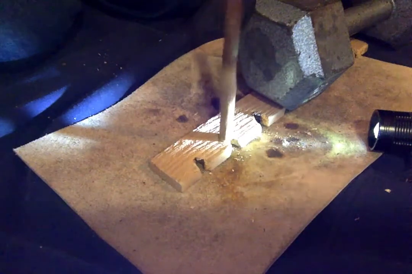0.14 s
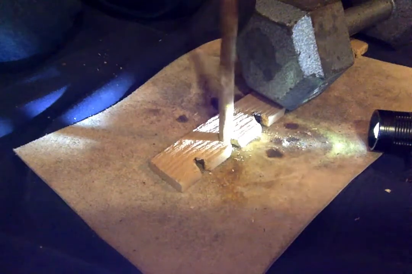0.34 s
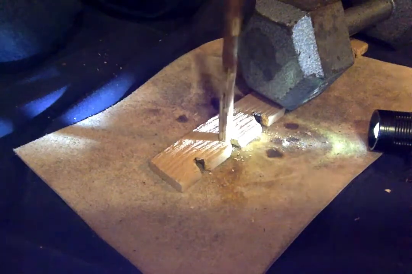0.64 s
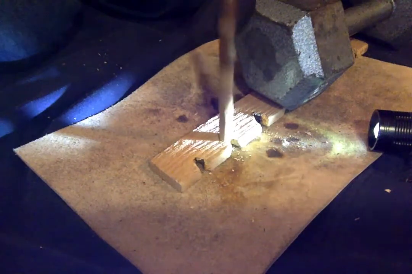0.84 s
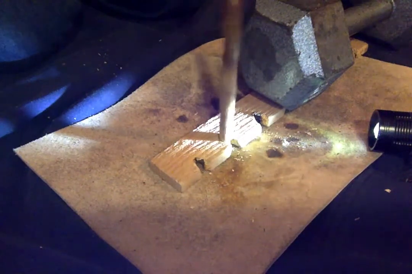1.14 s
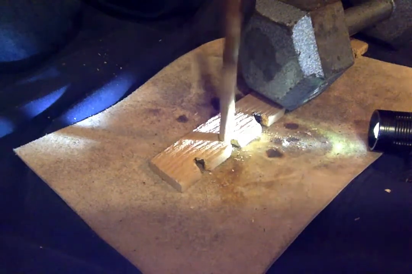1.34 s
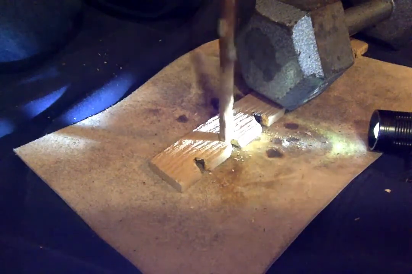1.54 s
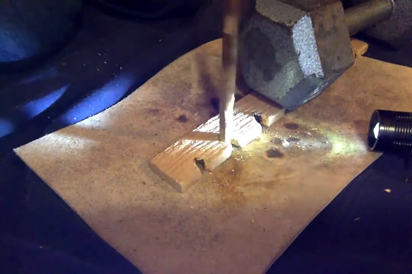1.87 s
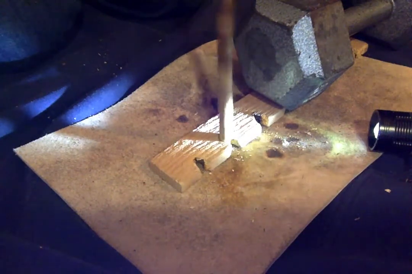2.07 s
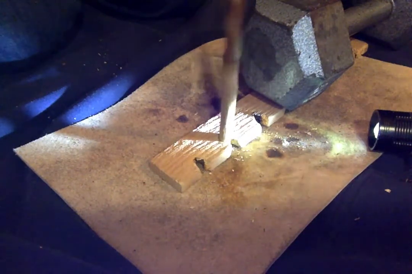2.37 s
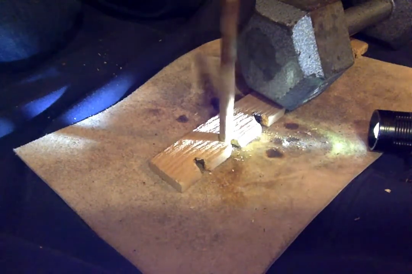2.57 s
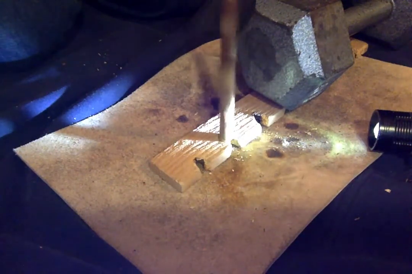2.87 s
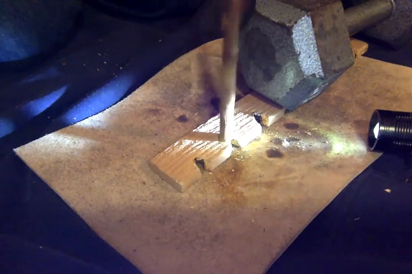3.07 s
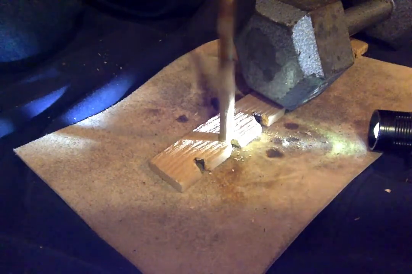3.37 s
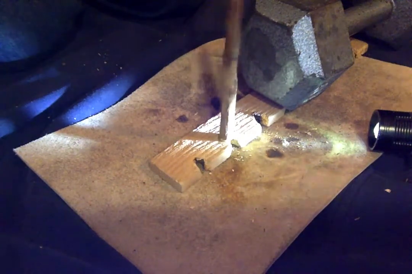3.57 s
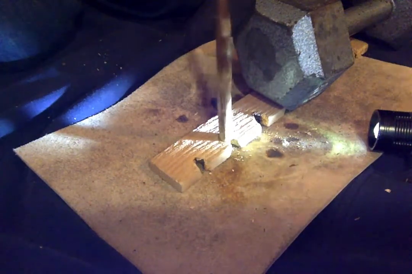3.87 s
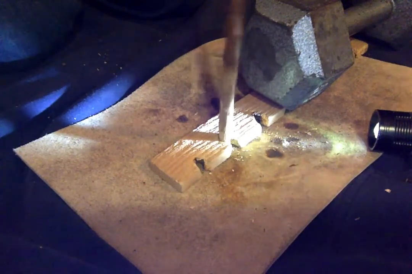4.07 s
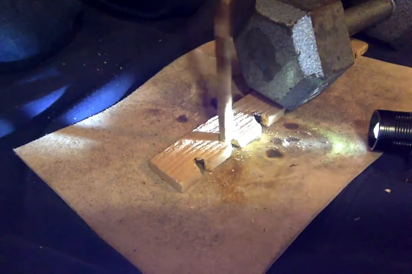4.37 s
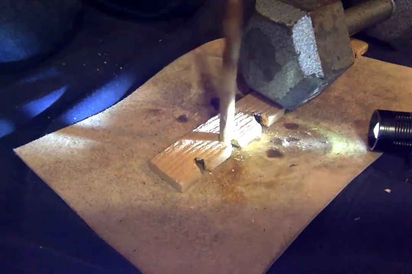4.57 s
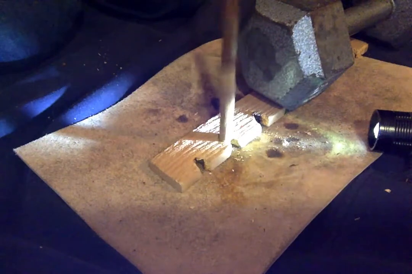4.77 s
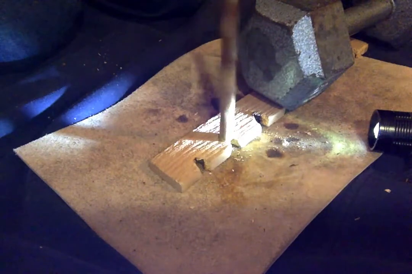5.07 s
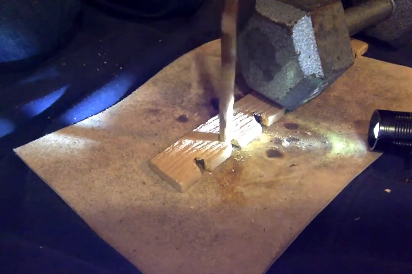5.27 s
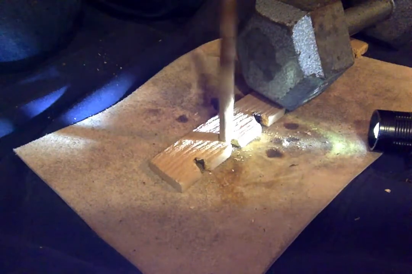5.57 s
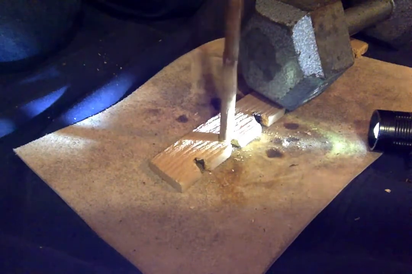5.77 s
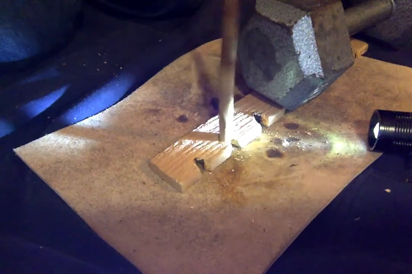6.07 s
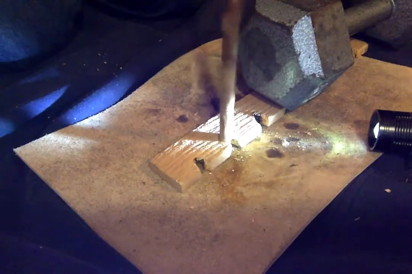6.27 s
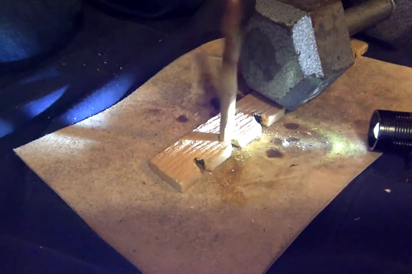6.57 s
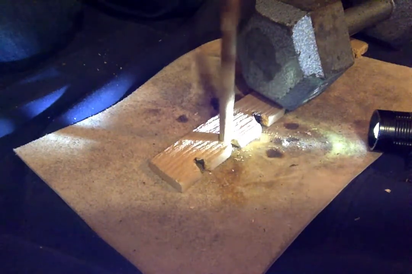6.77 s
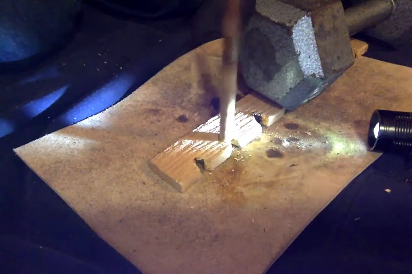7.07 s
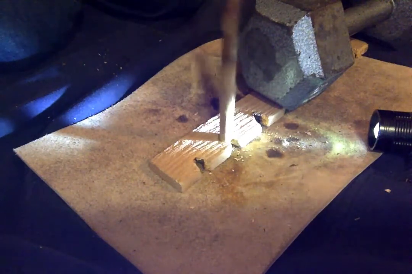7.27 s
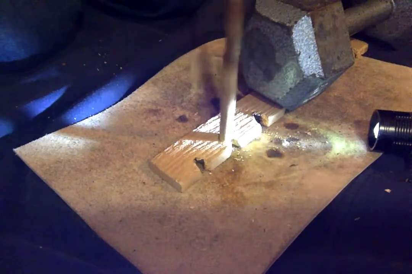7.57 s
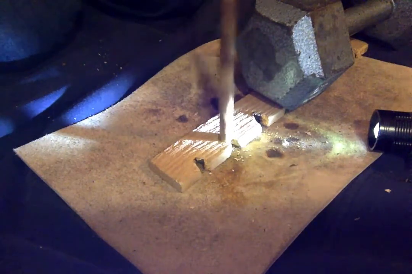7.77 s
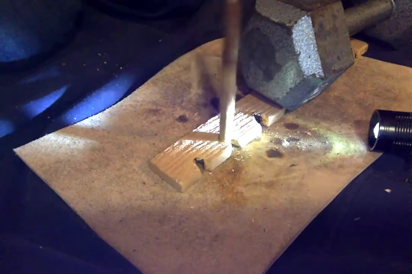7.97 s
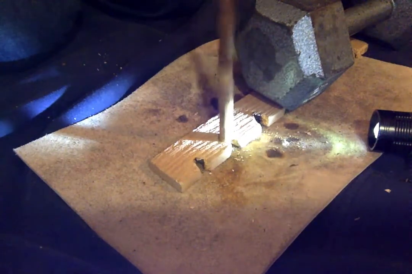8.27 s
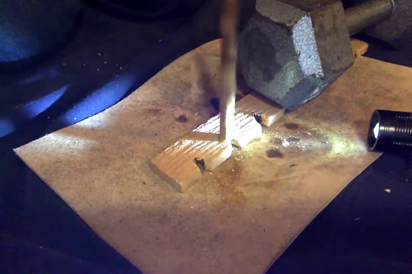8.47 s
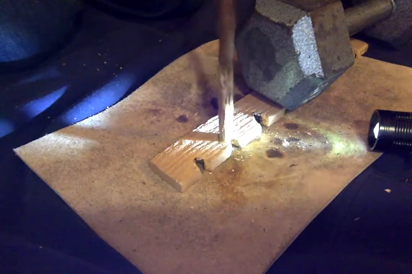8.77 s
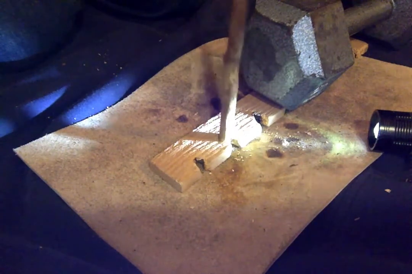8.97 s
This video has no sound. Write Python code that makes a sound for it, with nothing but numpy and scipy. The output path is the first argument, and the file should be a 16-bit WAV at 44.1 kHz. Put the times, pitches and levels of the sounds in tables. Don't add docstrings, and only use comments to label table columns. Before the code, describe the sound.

Close, dry to-and-fro scraping of a wooden stick twirled in a board socket, hissing and squeaking rhythmically, gradually quickening over faint outdoor air.

```python
import sys
import numpy as np
from scipy import signal
from scipy.io import wavfile
from scipy.ndimage import uniform_filter1d

SR = 44100
rng = np.random.default_rng(int(sys.argv[2]) if len(sys.argv) > 2 else 0)


def materialize(psi):
    bounded = np.clip(np.atleast_2d(psi).T, -1, 1)
    quanta = np.round(bounded * 32767).astype(np.int16)
    wavfile.write(sys.argv[1], SR, quanta)


def boost_factor(decibels):
    exponent = np.asarray(decibels, float) / 20
    return 10 ** exponent


N = 402633

# frequency in Hz, level in dB per Hz.
AIR_SPECTRUM = [(30, -22), (58, -9.5), (115, 3.5), (200, -9), (500, -10.5), (2500, -8.5), (7000, -11),
                (15800, -62)]
SPINDLE_TOP_HZ = 1950


def evened(x):
    return x / np.sqrt(np.mean(x ** 2) + 1e-20)


def colour(points, lo_hz=1, hi_hz=30000, modes=()):
    hz = abs(np.fft.fftfreq(4096, 1 / SR)) + 1
    point_hz, point_db = np.transpose(points)
    db = np.interp(np.log(hz), np.log(point_hz), point_db)
    for mode_hz, width_hz, peak_db in modes:
        db = db + peak_db / (1 + (2 * (hz - mode_hz) / width_hz) ** 2)
    gain = boost_factor(db) / np.sqrt((1 + (lo_hz / hz) ** 24) * (1 + (hz / hi_hz) ** 24))
    log_gain = np.log(gain + 1e-7)
    spectrum = np.exp(log_gain - 1j * signal.hilbert(log_gain).imag)
    return np.fft.ifft(spectrum).real[:2048] * np.hanning(4096)[2048:]


def through(x, taps):
    return evened(signal.oaconvolve(x, taps)[:N])


def resonate(x, hz, width_hz):
    turn = np.exp(2j * np.pi * np.cumsum(hz * np.ones(len(x))) / SR)
    r = np.exp(-np.pi * width_hz / SR)
    return 2 * (turn * signal.lfilter([1 - r], [1, -r], x / turn)).real


def add(mix, start_s, sound):
    at = round(start_s * SR)
    part = mix[max(at, 0):][:len(sound) + min(at, 0)]
    part += sound[max(-at, 0):][:len(part)]


def patches(shape, bins, frames):
    across_bins = uniform_filter1d(rng.standard_normal(shape), bins, 0)
    return evened(uniform_filter1d(across_bins, frames, 1))


def flicker(ms, depth_db):
    catches = rng.exponential(1, N) * (rng.random(N) < 1500 / ms / SR)
    eased = signal.lfilter([1], [1, -np.exp(-1000 / ms / SR)], uniform_filter1d(catches, 40))
    return evened(boost_factor(np.minimum(depth_db * evened(eased - eased.mean()), 1.2 * depth_db)))


def strokes():
    # frequency in Hz, level in dB per Hz.
    wood_spectrum = [(88, -60), (150, -38), (205, -40.5), (361, -20), (512, -10.5), (686, -9.5), (1230, -5),
                     (1550, 15), (1960, -11), (3200, -8.5), (4120, -8.5), (6450, -15.5), (7110, -16),
                     (9900, -12), (15800, -17.5)]
    # frequency in Hz, width in Hz, peak in dB.
    body_modes = [(655, 270, 11.5), (1020, 245, 9), (2160, 74, 3), (4150, 120, 2.5), (6300, 1460, 10.5)]
    thud_top_hz, board_top_hz, grind_top_hz = 430, 1280, 7200

    grind_db, dust_db, ring_db, board_db, thud_db = hands()
    force = mottled(grit() * flicker(4, depth_db=0.47), patchy_db=2.4)

    grind = through(force, colour(wood_spectrum, SPINDLE_TOP_HZ, grind_top_hz, body_modes))
    grind = swept(grind, palms(grind_db))
    dust = through(force, colour(wood_spectrum, grind_top_hz))

    board_force = force * flicker(12, depth_db=2.5)
    board = through(board_force, colour(wood_spectrum, thud_top_hz, board_top_hz, body_modes))

    push = force * flicker(17, depth_db=2.7)
    thud = through(push, colour(wood_spectrum, 102, thud_top_hz))
    thud += 0.038 * through(push, colour(AIR_SPECTRUM, hi_hz=198))
    thud *= boost_factor(thud_db + 6.5)

    wander = patches((1, N), 1, 900)[0]
    spindle = through(force, colour(wood_spectrum, board_top_hz, SPINDLE_TOP_HZ))
    mode = resonate(force * flicker(9, depth_db=2.5), 1610 * (1 + 0.05 * wander), 75)
    ring = evened(0.7 * spindle + evened(mode))

    squeal = resonate(force * flicker(4, depth_db=2.5), 8500 * (1 + 0.04 * wander), 1800)
    squeal = evened(resonate(squeal, 8640, 2700))
    plain_db = np.minimum(dust_db, grind_db - 0.5)
    squeal_gain = np.sqrt(boost_factor(2 * dust_db) - boost_factor(2 * plain_db))

    wood = boost_factor(grind_db) * (grind + boost_factor(ring_db) * ring + boost_factor(board_db) * board) + thud
    return wood + boost_factor(plain_db) * dust + squeal_gain * squeal


def grit(per_s=5000, spread_db=7.5, share=0.39):
    sizes = boost_factor(spread_db * np.minimum(rng.exponential(1, N), 3.2))
    snaps = sizes * (rng.random(N) < per_s / SR)
    return rng.standard_normal(N) + share * evened(snaps * rng.choice([-1, 1], N))


def mottled(x, patchy_db):
    z = signal.stft(x, nperseg=256)[2]
    field = 0.6 * patches(z.shape, 2, 5)
    field += 0.55 * patches(z.shape, 20, 2)
    field += 0.75 * patches(z.shape, 2, 30)
    return evened(signal.istft(z * boost_factor(patchy_db * field), nperseg=256)[1][:N])


def palms(grind_db):
    turns = signal.find_peaks(-grind_db, prominence=12)[0]
    return 1 - abs(np.interp(np.arange(N), turns, np.arange(len(turns))) % 2 - 1)


def swept(grind, place):
    from_hz, span_hz, width_hz = 2930, 5500, 1900
    start_db, grows_db_per_s, best_place, fall_db = -5.0, 0.6, 0.27, 45.0
    sweep_db = start_db + grows_db_per_s * np.arange(N) / SR - fall_db * (place - best_place) ** 2
    return evened(grind + boost_factor(sweep_db) * resonate(grind, from_hz + span_hz * place, width_hz))


def hands():
    # start in seconds, length in seconds, grinding in dB,
    # fine dust in dB above it, spindle ring in dB above it.
    away = [(-0.149, 0.21, -28.5, 0, 3.5), (0.455, 0.25, -30, 0.5, -5.5), (1.043, 0.26, -30.5, 1, -6.5),
            (1.665, 0.23, -29.5, 0.5, -10), (2.239, 0.23, -30, 3, -9.5), (2.77, 0.27, -31, 0.5, -7.5),
            (3.358, 0.23, -31.5, 0.5, -4.5), (3.911, 0.25, -31.5, 1, -10.5), (4.462, 0.23, -31, 1.5, -10),
            (5.005, 0.23, -31.5, 1.5, -8), (5.533, 0.22, -30.5, -0.5, -5), (6.056, 0.2, -31.5, 0, -9.5),
            (6.531, 0.2, -31.5, 0, -6.5), (6.995, 0.2, -32, 1, -3.5), (7.448, 0.21, -32.5, 0.5, -8.5),
            (7.913, 0.2, -31.5, 0, -7.5), (8.397, 0.2, -32.5, -1, -3.5), (8.851, 0.16, -31, 0, -5.5)]
    back = [(0.143, 0.25, -32, -0.5, -1), (0.757, 0.24, -33, 0.0, -5), (1.363, 0.25, -33.5, -1, -1.5),
            (1.967, 0.2, -31, -0.5, -3.5), (2.531, 0.22, -32, -1, -0.5), (3.07, 0.25, -34, -0.5, -2),
            (3.651, 0.22, -33, -1.5, 2.5), (4.209, 0.22, -33.5, 0.5, -3), (4.748, 0.23, -33.5, -0.5, -5),
            (5.286, 0.2, -33, -0.5, -1), (5.809, 0.18, -32.5, -0.5, 1.5), (6.286, 0.2, -33, -2, -4.5),
            (6.777, 0.18, -33, -1, 0), (7.243, 0.17, -33.5, -1.5, 0), (7.71, 0.16, -32.5, -1.5, -0.5),
            (8.159, 0.15, -32.0, -2, -1), (8.641, 0.15, -31.5, -1.5, -1), (9.078, 0.14, -35.5, 3, 0.5)]
    # time in seconds, board in dB above grinding, thud in dB,
    # lean in dB from start to end, creep in dB before the start.
    away_weight = [(0.0, -6.5, -69, 4.5, -25), (0.619, -8, -57.5, 4, -49), (1.216, -6, -54, 7.5, -38),
                   (1.799, -10, -57.5, 7, -31), (2.397, -9, -58, 6.5, -21), (2.934, -8, -57, 8, -38),
                   (3.485, -7.5, -56.5, 4, -42), (4.074, -7, -50.5, 0.5, -14), (4.609, -9, -57.5, 5.5, -40),
                   (5.142, -7.5, -53.5, 5, -38), (5.685, -8.5, -54.5, 6, -21),
                   (6.153, -11, -50.5, 4.5, -24), (6.633, -6.5, -55, 2, -16.5), (7.107, -7, -52, 6.5, -18),
                   (7.567, -7, -51.5, 8.5, -13.5), (8.027, -9, -53, 5.5, -21),
                   (8.501, -6.5, -56.5, 2.5, -18), (8.937, -6, -49, 9.5, -23)]
    back_weight = [(0.258, -5, -52, -8.5, -27), (0.88, -5.5, -59, -3.5, -25), (1.509, -5, -54, -10, -20),
                   (2.134, -3, -50.5, 1.5, -28), (2.633, -6.5, -52, -2, -21.5), (3.224, -4, -55.5, 1, -35),
                   (3.74, -4.5, -58, -3, -18), (4.306, -6, -57.5, 0.5, -27), (4.872, -6, -59.5, 0, -26),
                   (5.377, -6.5, -52.5, -0.5, -24), (5.912, -6.5, -51, -4.5, -34),
                   (6.383, -6.5, -57, -6.5, -18), (6.878, -3, -53.5, -5, -30), (7.322, -4, -55.5, -3, -21),
                   (7.81, -4, -52.5, -1.5, -23), (8.241, -4, -52.5, -1.5, -18), (8.734, -5, -55, 3.5, -17),
                   (9.129, -5, -60, -4, -12.5)]
    # share of the stroke, level in dB against full spin.
    away_spin = [(-.06, -72), (0, -18.5), (.06, -4), (.18, 0.5), (.3, 1), (.72, -1.5), (.85, -5.5),
                 (1, -19.5), (1.12, -51)]
    back_spin = [(-.06, -33), (0, -24), (0.062, -7), (.16, -1.5), (.25, -1), (.6, 0), (.75, -2.5),
                 (1, -13.5), (1.119, -38)]
    # rise in seconds, release in seconds, board, thud and ring added in dB.
    away_press = (0.011, 0.027, 6.04, 12.5, 0.7)
    back_press = (0.025, 0.1, 6.6, 17.4, 1.3)
    # ring early, ring late, board early,
    # board late, all in dB per dB.
    away_slow = (0.73, -0.34, 1, 0.17)
    back_slow = (0.26, -0.28, 0.69, 0.42)
    away_ring_lean_db, back_ring_lean_db = 0, 2.5

    t, out = np.arange(N) / SR, np.full((5, N), -90.)
    ways = [(away, away_weight, away_spin, away_press, away_slow, away_ring_lean_db),
            (back, back_weight, back_spin, back_press, back_slow, back_ring_lean_db)]
    for rows, weights, *rules in ways:
        for row, weight_row in zip(rows, weights):
            first = max(round((row[0] - 0.05) * SR), 0)
            span = slice(first, round((row[0] + row[1] + 0.05) * SR))
            levels = stroke(t[span], row, weight_row, *rules)
            out[:, span] = np.where(levels[0] > out[0, span], levels, out[:, span])
    grind_db, dust_db, ring_db, board_db, thud_db = out
    uneven = patches((3, N), 1, 1500) * [[0.5], [0.5], [0.6]]
    uneven_grind_db = grind_db + uneven[0]
    return uneven_grind_db, uneven_grind_db + dust_db, ring_db + uneven[1], board_db + uneven[2], thud_db


def stroke(t, row, weight_row, shape, press, keeps, ring_lean_db):
    start, length, grind_db, dust_db, ring_db = row
    weight_s, board_db, thud_db, lean_db, creep_db = weight_row
    rise_s, release_s, board_press_db, thud_press_db, ring_press_db = press
    ring_early, ring_late, board_early, board_late = keeps
    creep_s, slowest_db = 0.022, -10.5
    dust_early, dust_late = 0.54, 0.0078
    plain_dust_db, squeal_at, squeal_width = 1, 0.54, 0.16

    u = (t - start) / length
    spin = np.interp(u, *np.transpose(shape)) + lean_db * (np.clip(u, 0, 1) - 0.5)
    creep = creep_db + 2.5 - 12 * ((start - t) / creep_s) ** 2
    spin = np.where(u < 0, np.maximum(spin, creep), spin)
    slow, early = np.minimum(spin, 0), u < 0.5
    short = -np.maximum(slow, slowest_db)
    light = 1 - np.exp(-((t - weight_s) / np.where(t < weight_s, rise_s, release_s)) ** 2)
    squeal = max(dust_db - plain_dust_db, 0) * np.exp(-((u - squeal_at) / squeal_width) ** 4)

    dust = min(dust_db, plain_dust_db) + squeal + np.where(early, dust_early, dust_late) * slow
    ring = ring_db + np.where(early, ring_early, ring_late) * short - ring_press_db * light
    ring = ring + ring_lean_db * (u - 0.5)
    board = board_db + np.where(early, board_early, board_late) * short - board_press_db * light
    thud = thud_db + slow - thud_press_db * light
    return [grind_db + spin, dust, ring, board, thud]


def bursts(rows, glide, rough, wobble):
    out = np.zeros(N)
    noises = rng.standard_normal((len(rows), 2, 4000))
    for (centre_s, db, hz, ms), (noise, waver) in zip(rows, noises):
        u = np.arange(-ms * 1.2, ms * 1.5, 1000 / SR)[:4000] / ms
        swell = np.exp(-4 * np.log(2) * (u * np.where(u < 0, 1.15, 0.9)) ** 2)
        swell *= 1 + rough * evened(uniform_filter1d(noise, round(2 * SR / hz)))[:len(u)]
        cycles_6 = round(6 * SR / hz)
        waver = uniform_filter1d(uniform_filter1d(waver, cycles_6), cycles_6)
        waver = wobble * evened(waver)[:len(u)]
        phase = 2 * np.pi * np.cumsum(hz * (1 - glide * u + waver)) / SR
        add(out, centre_s + u[0] * ms / 1000, boost_factor(db) * swell * np.sin(phase))
    return out


def spindle_chirps():
    # centre in seconds, peak in dB, pitch in Hz, length in ms.
    chirps = [(0.0015, -24, 1590.0, 0.17), (0.1996, -18, 1560, 6), (0.2432, -9, 1580, 7.4),
              (0.4758, -35, 1600, 5.2), (0.505, -26, 1559, 5), (0.855, -17, 1609, 6.8),
              (0.8768, -28, 1594, 6.8), (1.1724, -23.5, 1600, 11.1), (1.237, -24.0, 1690, 4.7),
              (1.4178, -19.5, 1583, 6.4), (1.7032, -34, 1590, 8.8), (2.0176, -22.5, 1634, 3.6),
              (2.1327, -21.5, 1514, 5.4), (2.5627, -26.0, 1683, 8.1), (2.5971, -25, 1660, 7.0),
              (2.6935, -26, 1574, 3.8), (3.1012, -23.5, 1594, 8.7), (3.2769, -31, 1490.0, 5.1),
              (3.6958, -10, 1630.0, 9.9), (3.8223, -21, 1503, 6.7), (3.9796, -30, 1610, 6.6),
              (4.0718, -28, 1580, 4.3), (4.6096, -27, 1610, 4.4), (4.6349, -30, 1630, 4),
              (4.8715, -25, 1614, 4.5), (4.9269, -27, 1610.0, 6.0), (5.3606, -17.5, 1577, 7.6),
              (5.347, -25, 1600, 8), (5.378, -25, 1580, 8), (5.5965, -28, 1696, 13.5),
              (6.1, -32, 1663, 7.5), (6.1955, -18.5, 1605, 4.4), (6.3118, -28.0, 1665, 6.7),
              (6.6723, -29, 1710, 5.5), (6.9348, -26.5, 1500, 6.2), (7.0436, -23.5, 1627, 8.6),
              (7.143, -29.5, 1633, 9.9), (7.334, -26, 1610, 5.8), (7.4993, -26.0, 1694, 11.5),
              (7.6071, -23, 1730, 3.6), (7.8102, -28, 1514, 6.9), (7.9603, -25.5, 1668, 14.0),
              (8.0626, -25, 1680, 4.8), (8.218, -23, 1510, 10.5), (8.261, -24.5, 1530.0, 6.6),
              (8.425, -29, 1625, 7), (8.52, -29, 1556, 6), (8.8702, -26.5, 1556, 6.3),
              (8.9229, -26.5, 1740, 8)]
    return bursts(chirps, glide=0.0039, rough=0.075, wobble=0.017)


def tip_squeaks():
    # centre in seconds, peak in dB, pitch in Hz, length in ms.
    squeaks = [(0.0047, -24, 9020, 0.98), (0.5582, -21.5, 8550, 5.1), (0.6216, -22.5, 8900, 2.7),
               (0.6387, -18, 9600, 1.2), (1.1579, -21, 8590, 7.2), (1.2118, -10, 8880, 2),
               (1.217, -18, 9000, 3.3), (1.2323, -21.5, 8800, 1.8), (1.2397, -26, 8500, 1.3),
               (1.7419, -26, 8200, 5.5), (1.7959, -16, 8680, 5.6), (1.803, -14, 8570, 3.3),
               (1.7525, -23, 9300, 2.8), (1.776, -23, 8800, 2), (1.811, -20, 8570, 3),
               (1.816, -19, 8450, 2.4), (1.8229, -19.0, 8500, 3.2), (2.3198, -14, 8070, 2.9),
               (2.333, -23, 8400, 4), (2.3755, -16, 8680, 4.5), (2.3809, -19.5, 8390, 3.5),
               (2.8725, -16, 8200, 3.5), (2.91, -13, 8790, 2.6), (2.9324, -23, 8640, 2.5),
               (2.939, -12.5, 8660, 3.2), (2.9619, -20, 8550, 1.6), (3.4287, -16, 8290, 3.8),
               (3.4395, -16.5, 8260, 5.4), (3.4607, -17.5, 8870, 2.9), (3.4851, -19.5, 8800, 4.5),
               (3.9775, -12.5, 8580, 4.5), (4.0097, -17, 8700, 2.8), (4.0275, -17.0, 8040, 0.83),
               (4.0339, -12, 8070, 1.9), (4.0399, -14.5, 8870, 2.1), (4.0509, -17, 8170, 2.9),
               (4.0619, -17, 8500, 2.1), (4.5374, -24, 7530, 1.24), (4.5427, -22, 7550, 5.2),
               (4.5528, -22, 9200, 2.4), (4.58, -21, 8400, 1.5), (4.601, -14.5, 8080, 6.2),
               (4.6092, -20.0, 9450, 1.5), (4.6234, -20, 8260, 3), (5.077, -21, 8430, 4.8),
               (5.087, -18.5, 9200, 4.2), (5.1324, -18, 8300, 1.5), (5.1424, -21.5, 9430, 3.7),
               (5.202, -23, 9560, 2.8), (5.5929, -25, 8260, 2.7), (6.1499, -23, 8720, 4.5),
               (6.6193, -25, 8540, 5.7), (7.0958, -30, 8750, 8), (8.0769, -23.5, 8990, 3),
               (8.9747, -23.0, 9500, 2.6)]
    return bursts(squeaks, glide=0.002, rough=0.35, wobble=0.045)


def fibre_tears():
    # centre in seconds, peak in dB, pitch in Hz, length in ms.
    tears = [(0.6334, -29, 4240, 5.6), (1.133, -26, 2690, 7), (4.562, -21, 6500, 3), (4.547, -18, 6450, 3),
             (1.1359, -25, 4570, 7.7), (1.8135, -23, 4960, 4.0), (2.3988, -28, 4930.0, 6.9),
             (2.8384, -29, 5360, 9.7), (2.9108, -28, 5870.0, 14), (3.4363, -29, 5800, 5.6),
             (3.5323, -36, 4940, 3.7), (4.0299, -17, 6030.0, 2.4), (4.092, -22, 6070, 3.3),
             (4.2467, -30, 5360.0, 9.1), (4.5388, -12, 6380.0, 2.8), (5.1887, -27, 4680, 4.9),
             (5.6576, -34, 4510, 2.7), (5.6998, -29, 4990, 8.1), (5.8508, -21.5, 4530, 6),
             (6.6737, -30, 4870, 6.6), (6.8106, -31, 4750, 3.3), (7.1492, -23, 4340, 3.6),
             (7.2766, -21, 5030, 2.7), (7.4939, -27.5, 3920, 4.5), (7.6108, -27.5, 4560.0, 7.8),
             (8.0637, -28, 5130.0, 9.3), (8.4853, -30, 5610.0, 7.4)]
    return bursts(tears, glide=0.002, rough=0.35, wobble=0.045)


def ticks():
    # start in seconds, peak in dB, share of board against spindle 0-1, crack in dB above the peak.
    rocks = [(1.031, -38, 1, 1), (1.6545, -29, 1, -22), (0.463, -42, 0.7, -11), (4.4555, -41, 0.6, -10),
             (0.14, -45, 0.7, -12), (2.205, -33, 0, -8), (2.2175, -25, 0.2, -5), (3.5, -40, 0.5, 0),
             (3.372, -26, 0, -10), (6.04, -37, 0.95, -12), (6.263, -30, 0.44, -10), (6.506, -30, 0.65, -13),
             (6.757, -34, 0.78, -10), (6.981, -22, 0.28, -18), (7.244, -21, 0.23, -22), (8, -31, 0.3, -14),
             (7.9, -32, 0.1, -14), (8.149, -28, 0, -14), (5.005, -29, 0.2, -14), (3.085, -24, 0.3, -14),
             (8.35, -36, 0.63, -7)]
    out, t = np.zeros(N), np.arange(1300) / SR
    spindle = boost_factor(-60 * t / 0.025) * np.sin(2 * np.pi * 1580 * t)
    board = boost_factor(-60 * t / 0.026) * np.sin(2 * np.pi * 720 * t)
    onset = np.minimum(t / 0.00063, 1)
    for (start_s, db, share, crack_db), noise in zip(rocks, rng.standard_normal((len(rocks), len(t)))):
        snap = noise * boost_factor(-60 * t / 0.008)
        crack = 2 * resonate(snap, 3900, 1400) + 0.03 * np.diff(snap, prepend=0)
        ring = ((1 - share) * spindle + share * board) * onset
        add(out, start_s, boost_factor(db) * (ring + boost_factor(crack_db) * crack))
    return out


def board_knocks():
    # centre in seconds, peak in dB, pitch in Hz, length in ms.
    knocks = [(1.5069, -35.5, 780, 13.3), (1.798, -37.5, 835, 14.0), (2.135, -37, 748, 7.2),
              (2.6317, -26, 665, 7.4), (2.8041, -38, 847, 11), (2.9342, -33, 775, 6.3),
              (3.4178, -33, 1020.0, 8.1), (3.6924, -39, 520.0, 5.7), (4.0735, -31, 683, 6.5),
              (4.6095, -29, 777, 5.5), (5.3763, -35, 780.0, 8.4), (5.5648, -42, 867, 7.3),
              (6.1432, -34, 760, 10.7), (6.5248, -37, 830, 5.2), (6.6325, -31, 795, 6.1),
              (7.108, -29, 720.0, 6.0), (7.3185, -35, 850, 12), (7.5657, -33, 680, 7.1),
              (7.8635, -39, 820, 11), (7.9136, -37, 720, 7), (8.0274, -38, 664, 12.7),
              (8.0665, -36.5, 540, 5), (8.1646, -37, 926, 8.4), (8.4095, -41, 572, 12),
              (8.9345, -34, 783, 8), (8.9666, -36, 855, 6.4), (9.0935, -35.5, 836, 5.4)]
    return bursts(knocks, glide=0.04, rough=0.35, wobble=0.06)


def deep_knocks():
    # centre in seconds, peak in dB, pitch in Hz, length in ms.
    knocks = [
        (1.102, -37, 305, 13),
        (1.1, -40, 500, 12),
        (2.634, -30, 372, 6.8),
        (3.692, -43, 303, 10.6),
        (4.0738, -34, 443, 4.97),
        (8.0253, -36, 360, 8.5),
        (8.407, -34, 433, 13.8),
        (2.366, -44, 357, 10.7),
    ]
    return bursts(knocks, glide=-0.15, rough=0.25, wobble=0.04)


def ground_thumps():
    # centre in seconds, peak in dB, pitch in Hz, length in ms.
    thumps = [(0.2925, -56, 120, 22), (1.5438, -62, 120, 22), (1.8119, -62.5, 110, 22),
              (2.0684, -59, 108, 16), (2.6351, -55, 150, 20), (2.9407, -53, 110, 24),
              (5.4296, -61, 130, 22), (5.6791, -60, 151, 22), (6.8787, -62, 140, 22.1),
              (7.1084, -66, 119, 22), (8.0552, -54, 120, 22), (8.5233, -61, 120, 22),
              (8.7396, -58, 121.3, 25)]
    return bursts(thumps, glide=0.04, rough=0.35, wobble=0.06)


def scattered(drill):
    t60_s, level_db = 0.26, -17.5
    tail = rng.standard_normal(5000) * boost_factor(-60 * np.arange(5000) / SR / t60_s)
    return boost_factor(level_db) * signal.oaconvolve(drill, tail / np.linalg.norm(tail))[:N]


def air():
    murmur = through(rng.standard_normal(N), colour(AIR_SPECTRUM))
    return boost_factor(-63) * murmur * flicker(70, depth_db=2.5)


def scene():
    drill = strokes() + spindle_chirps() + tip_squeaks() + fibre_tears()
    drill += ticks() + board_knocks() + deep_knocks() + ground_thumps()
    return (drill + scattered(drill) + air())[None]


def low_pass(x):
    return signal.sosfilt(signal.butter(12, 16160, fs=SR, output="sos"), x)


def record(dry):
    # frequency in Hz, proneness.
    starved = [(7250, 1.4), (8900, .7), (10800, 1.6), (13200, 1.7), (14800, 2.9)]
    edge_hz = 15830
    hz, _, z = signal.stft(dry[0], SR, nperseg=1024)
    power = abs(z) ** 2 + 1e-18
    contrast = power / uniform_filter1d(power, 24, 0)
    z = z * contrast ** (0.15 * (hz > SPINDLE_TOP_HZ))[:, None]

    fading = -np.gradient(np.log10(power.sum(0)))
    prone = sum(p * np.exp(-((hz - f) / 400) ** 2) for f, p in starved) + hz / 15000
    chance = np.repeat(patches((65, z.shape[1]), 1, 5), 8, 0)[:len(hz)]
    dropped = chance + prone[:, None] * (1 + np.clip(1.5 * fading, -0.5, 0.5)) > 3.1

    ends = (hz < edge_hz) * np.minimum(hz / 60, 1)
    z = z * np.where(dropped, boost_factor(-35), 1) * ends[:, None]
    kept = signal.istft(z, SR, nperseg=1024)[1][:N]
    kept = signal.sosfilt(signal.butter(2, 45, "high", fs=SR, output="sos"), kept)
    return low_pass(kept[None])


dry = scene()
out = record(dry)
materialize(out)
```